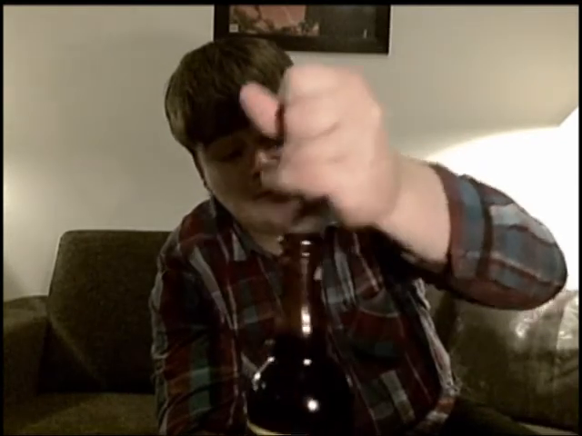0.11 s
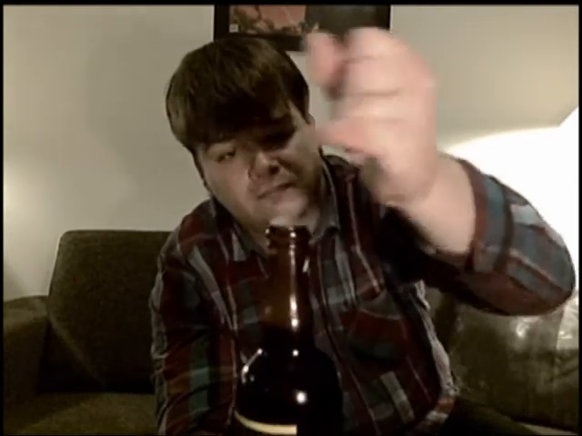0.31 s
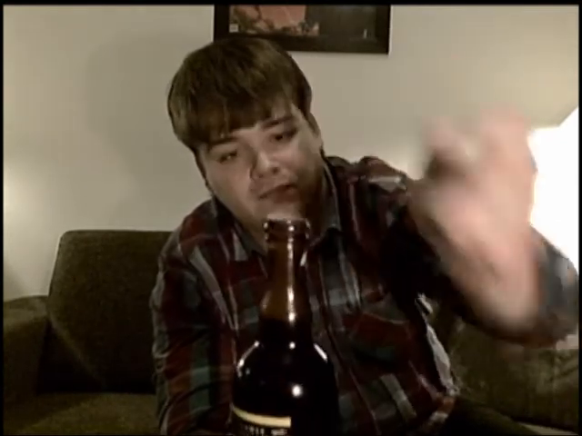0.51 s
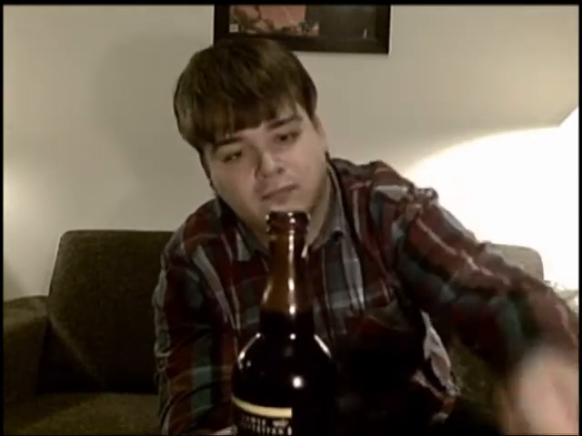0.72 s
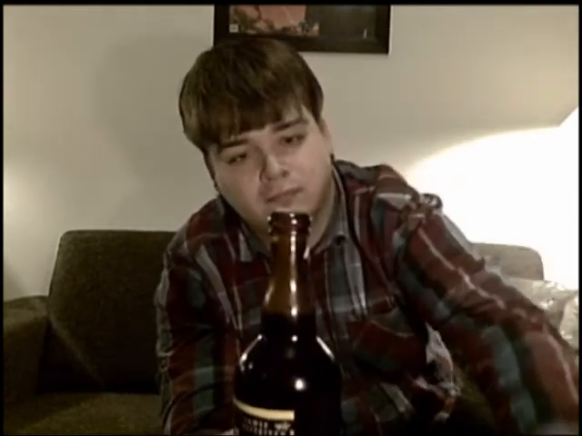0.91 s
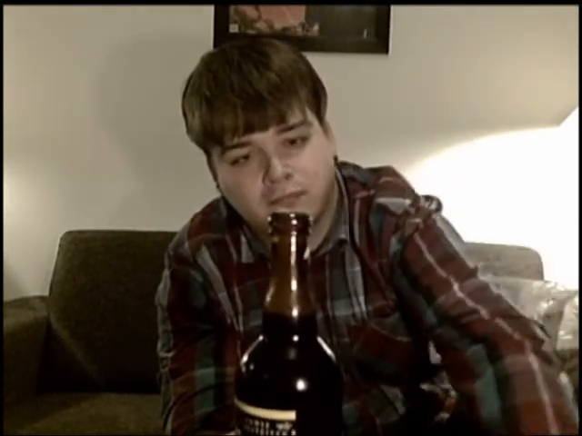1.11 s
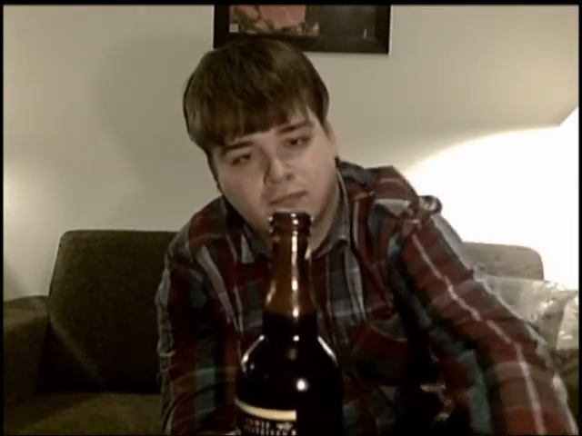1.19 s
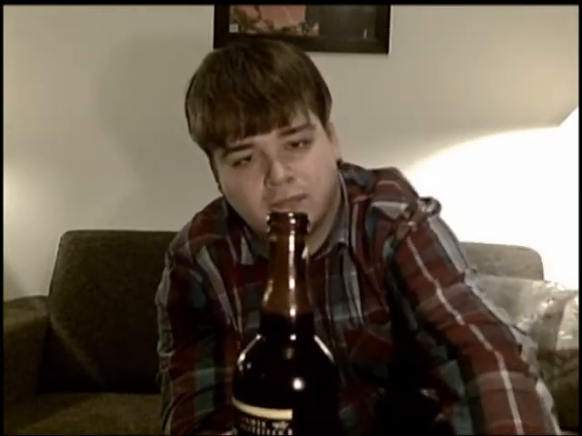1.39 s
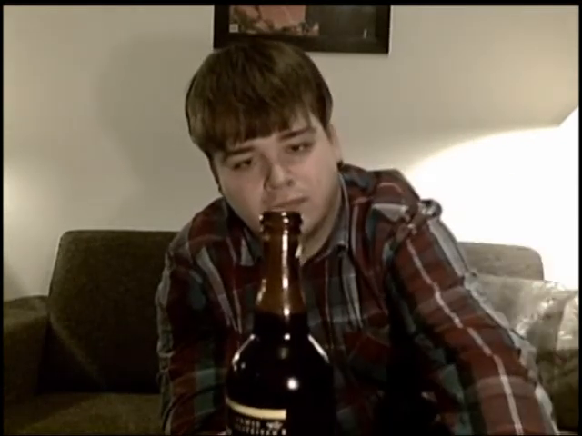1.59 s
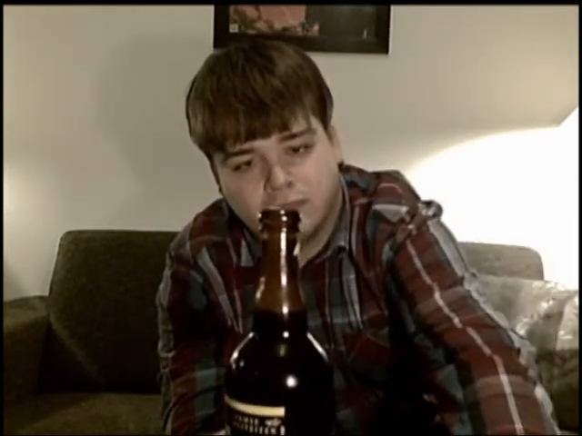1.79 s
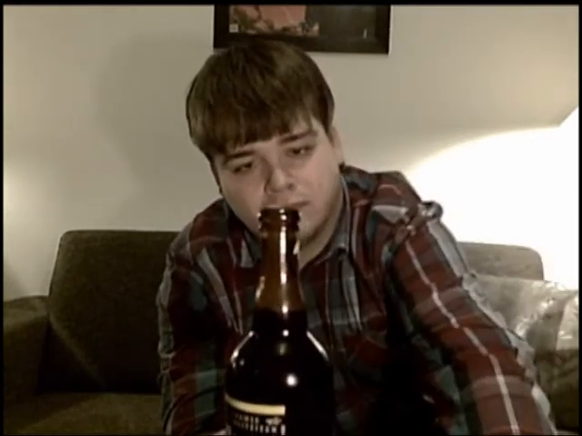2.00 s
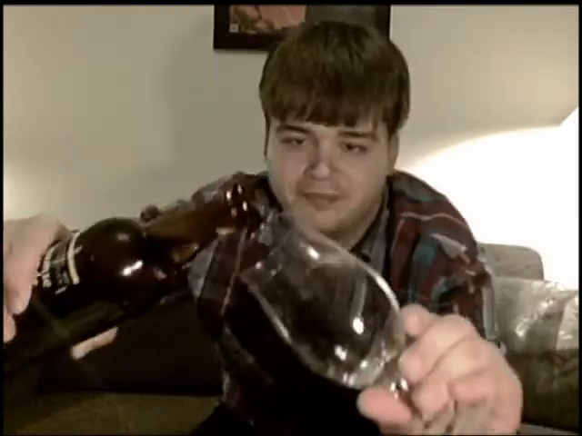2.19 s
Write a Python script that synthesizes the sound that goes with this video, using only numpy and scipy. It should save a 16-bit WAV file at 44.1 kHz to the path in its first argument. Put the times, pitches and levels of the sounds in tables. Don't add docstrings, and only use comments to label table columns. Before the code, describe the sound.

A cork pops from a glass bottle very close to the microphone, sharp and overloaded, with a hollow neck ring and short boxy room echo, then only a faint cooling fan remains.

```python
import sys
import numpy as np
from scipy import signal
from scipy.fft import rfft, irfft
from scipy.io import wavfile
from scipy.ndimage import uniform_filter1d

SR = 44100
rng = np.random.default_rng(int(sys.argv[2]) if len(sys.argv) > 2 else 0)


def gain_from_db(level_db):
    decades = np.asarray(level_db, float) / 20
    return 10 ** decades


def wav_record(signal):
    frames = np.transpose(np.atleast_2d(signal))
    bounded = np.clip(frames, -1, 1)
    quanta = np.round(bounded * 32767).astype(np.int16)
    wavfile.write(sys.argv[1], SR, quanta)


N = 97020

POP_S = 0.2232
SUCK_S, PUSH_S = 0.0009965, 0.001818


def decay(t, t60_s):
    return (t >= 0) * np.exp(-np.log(1000) * np.maximum(t, 0) / t60_s)


def damped_modes(t, modes, phases):
    total = 0
    for (pitch_hz, level_db, t60_s), phase in zip(modes, phases):
        total = total + gain_from_db(level_db) * decay(t, t60_s) * np.sin(2 * np.pi * pitch_hz * t + phase)
    return total


def on_log_axis(points, hz):
    p = np.array(points, float)
    return np.interp(np.log(np.maximum(hz, 1)), np.log(p[:, 0]), p[:, 1])


def slow_walk(rate_hz):
    k = int(SR / rate_hz)
    steps = np.repeat(rng.standard_normal(N // 50), k)[:N]
    smooth = uniform_filter1d(uniform_filter1d(steps, k), k)
    return (smooth - smooth.mean()) / smooth.std()


def third_octaves(points):
    hz = np.arange(N // 2 + 1) * SR / N
    octaves_above = np.maximum(np.log2(np.maximum(hz, 1) / points[-1][0]), 0)
    shape_db = on_log_axis(points, hz) - 60 * octaves_above
    spectrum = rfft(rng.standard_normal(N)) * gain_from_db(shape_db)
    spectrum = spectrum / np.std(irfft(spectrum, N))
    place = 3 * np.log2(np.maximum(hz, 20) / 20)
    slices = []
    for k in range(31):
        weight = np.clip(1 - abs(place - k), 0, 1)
        slices.append((20 * 2 ** (k / 3), irfft(spectrum * weight, N)))
    return slices


def pressure_pulse(t):
    suck_db, push_db = 19, 13
    suck = np.sin(np.pi * np.clip(t / SUCK_S, 0, 1))
    push = np.sin(np.pi * np.clip((t - SUCK_S) / PUSH_S, 0, 1))
    return gain_from_db(push_db) * push - gain_from_db(suck_db) * suck


def lip_crack(t):
    level_db, t60_s, centre_hz = 7.5, 0.011, 5000
    band = signal.butter(1, [centre_hz / 2, centre_hz * 2], "band", fs=SR, output="sos")
    crack = signal.sosfilt(band, rng.standard_normal(N))
    return gain_from_db(level_db) * crack * decay(t - SUCK_S, t60_s)


def neck_ring(t):
    # pitch_hz [Hz], level_db [dB], t60_s [s]
    neck = [(589.6, 11, 0.091), (1172, -18, 0.28), (1690, -12.5, 0.063)]
    return -damped_modes(t - SUCK_S - PUSH_S, neck, np.zeros(len(neck)))


def pop(t):
    return pressure_pulse(t) + lip_crack(t) + neck_ring(t)


def echoes(t, direct):
    # delay_s [s], level_db [dB]
    reflections = [
        (0.0172, -12.5),
        (0.0212, -12),
        (0.0246, -14),
        (0.041, -14),
        (0.0457, -17),
        (.0862, -26.5),
    ]
    return sum(gain_from_db(level_db) * np.interp(t - delay_s, t, direct) for delay_s, level_db in reflections)


def room_modes(t):
    # pitch_hz [Hz], level_db [dB], t60_s [s]
    low_modes = [(90.2, -19.5, 0.45), (139.8, -14, 0.44), (162.7, -10, 0.39), (181.4, -11.5, 0.37),
                 (204.7, -7, 0.35), (256.5, -14, 0.4), (289.4, -11.5, .45), (365.6, -14.5, .4),
                 (407.8, -8.5, .35), (486.6, -9.5, 0.27), (532.5, -4, .35), (574.7, -8.5, 0.44),
                 (666.3, -7, .3), (727.4, -3, 0.21)]
    # pitch_hz [Hz], level_db [dB], t60_s [s]
    beating_pair = [(598.2, 1, .36), (604.9, 6, 0.31)]
    rise_s = 0.003
    modes = damped_modes(t, low_modes, np.pi * np.arange(len(low_modes)))
    modes = modes - damped_modes(t - SUCK_S - PUSH_S, beating_pair, np.zeros(len(beating_pair)))
    return (1 - np.exp(-np.maximum(t, 0) / rise_s)) * modes


def diffuse_tail(t):
    # freq_hz [Hz], density_db [dB per Hz]
    tail_spectrum = [(60, -26), (180, -9), (650, -10.5), (900, -20.5), (3000, -25), (5000, -29.5),
                     (6200, -24), (8400, -38)]
    # freq_hz [Hz], t60_s [s]
    tail_t60 = [(100, 0.46), (600, 0.46), (2000, 0.33), (7000, 0.31)]
    level_db, rise_s = -6, 0.0033
    tail = sum(band * decay(t, on_log_axis(tail_t60, hz)) for hz, band in third_octaves(tail_spectrum))
    return gain_from_db(level_db) * (1 - np.exp(-np.maximum(t, 0) / rise_s)) * tail


def fan_hiss():
    # freq_hz [Hz], density_db [dB per Hz]
    airflow = [(20, 0.5), (60, -5.5), (300, -7.5), (1300, -12), (1700, -18.5), (3000, -21), (6400, -25),
               (8300, -37.5)]
    level_db, flicker_db = -50, -1
    hiss = sum(band * gain_from_db(flicker_db * slow_walk(3.1)) for _, band in third_octaves(airflow))
    return gain_from_db(level_db) * hiss


def fan_whine():
    # pitch_hz [Hz], level_db [dB rms]
    whine = [(247.6, -62.5), (742.9, -68.5), (1114, -63), (1674, -67.5), (2229, -77)]
    wobble_db, drift = 3, 0.0019
    shaft_s = np.cumsum(1 + drift * slow_walk(4.6)) / SR
    tones = 0
    for pitch_hz, level_db in whine:
        level = gain_from_db(level_db + wobble_db * slow_walk(5)) * np.sqrt(2)
        tones = tones + level * np.sin(2 * np.pi * (pitch_hz * shaft_s + rng.random()))
    return tones


def scene():
    t = np.arange(N) / SR - POP_S
    direct = pop(t)
    room = echoes(t, direct) + room_modes(t) + diffuse_tail(t)
    return (direct + room + fan_hiss() + fan_whine())[None]


def roll_off(x):
    return signal.sosfilt(signal.butter(12, 16890, fs=SR, output="sos"), x)


def record(dry):
    low_hz, top_hz, input_top_hz, ceiling = 25.5, 8500, 15900, 0.97
    soft = signal.sosfilt(signal.butter(8, top_hz, fs=SR, output="sos"), dry)
    soft = signal.sosfilt(signal.butter(1, low_hz, "high", fs=SR, output="sos"), soft)
    clipped = np.clip(soft, -ceiling, ceiling)
    flat = signal.sosfiltfilt(signal.ellip(8, 0.1, 40, input_top_hz, fs=SR, output="sos"), clipped)
    return roll_off(np.clip(flat, -1, 1))


dry = scene()
out = record(dry)
wav_record(out)
```